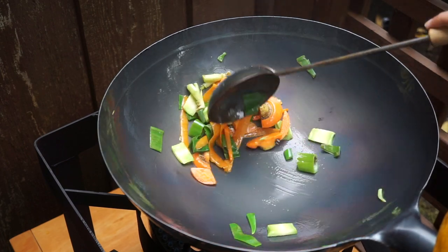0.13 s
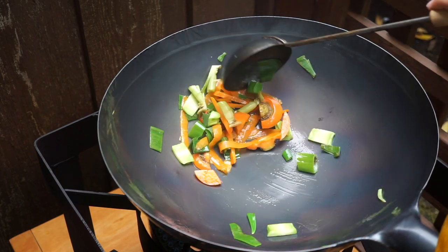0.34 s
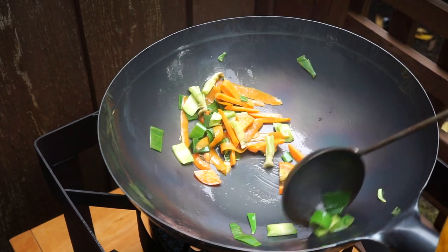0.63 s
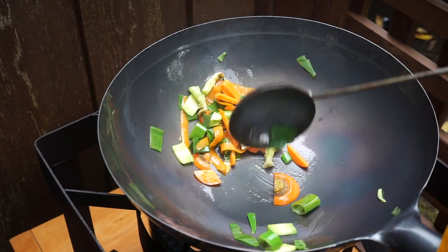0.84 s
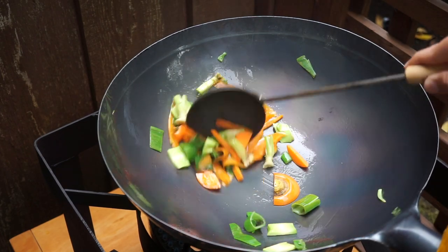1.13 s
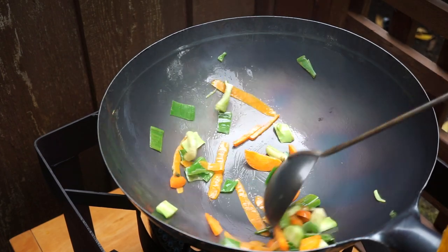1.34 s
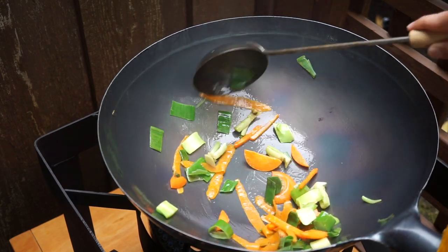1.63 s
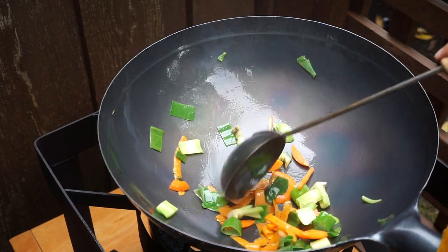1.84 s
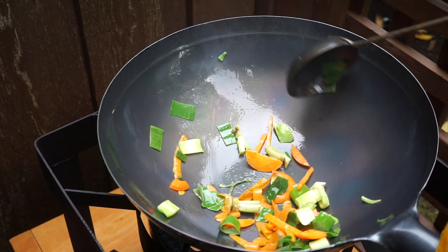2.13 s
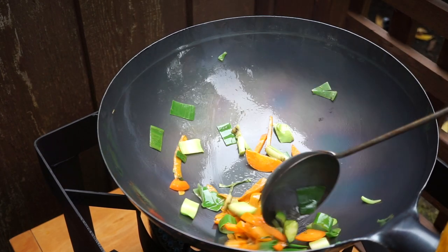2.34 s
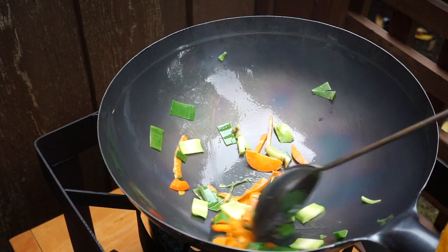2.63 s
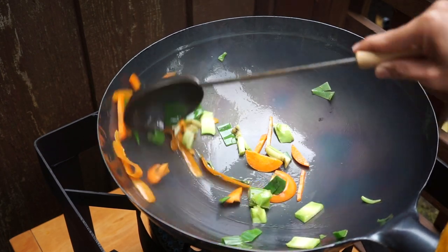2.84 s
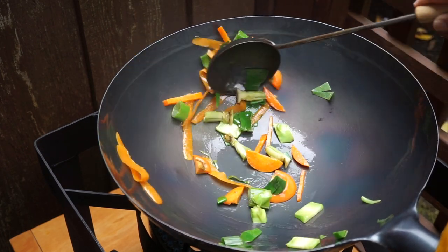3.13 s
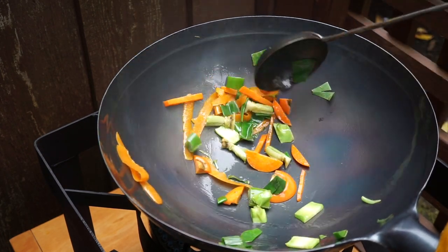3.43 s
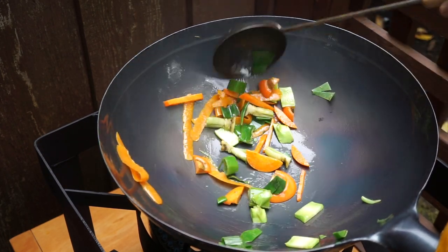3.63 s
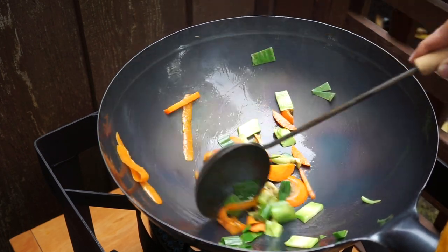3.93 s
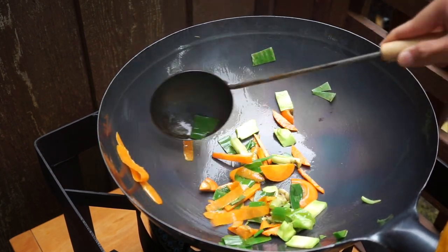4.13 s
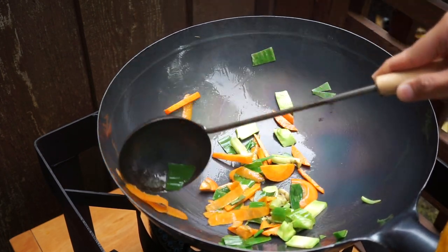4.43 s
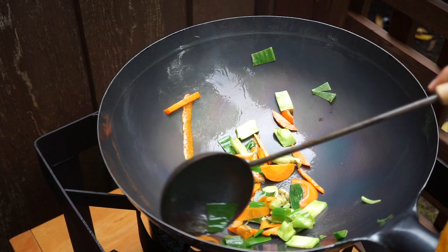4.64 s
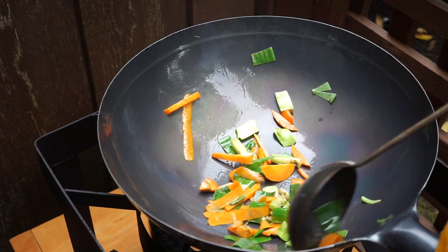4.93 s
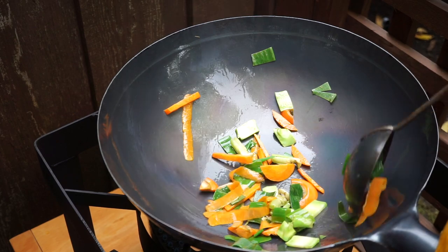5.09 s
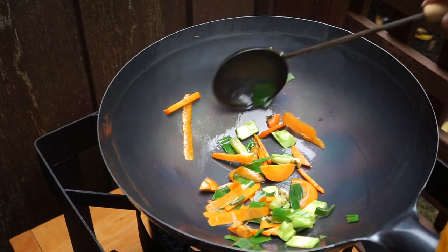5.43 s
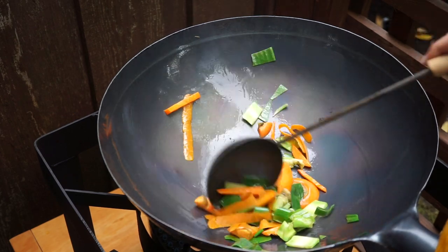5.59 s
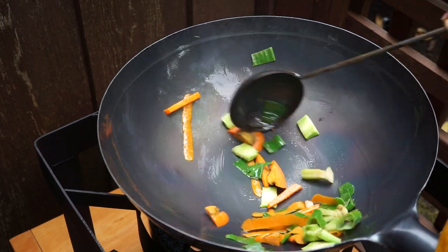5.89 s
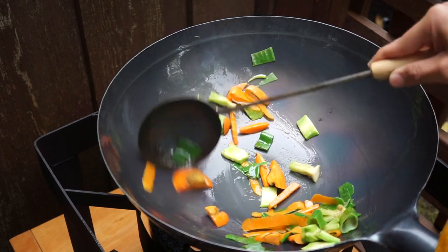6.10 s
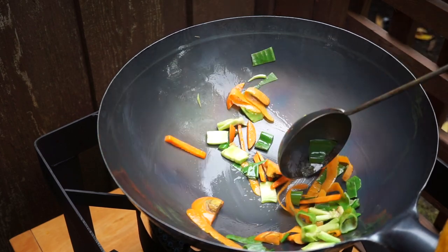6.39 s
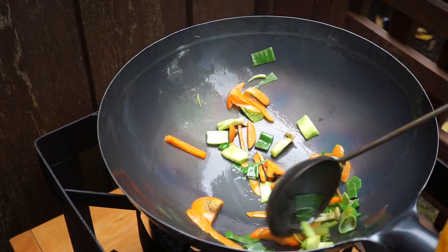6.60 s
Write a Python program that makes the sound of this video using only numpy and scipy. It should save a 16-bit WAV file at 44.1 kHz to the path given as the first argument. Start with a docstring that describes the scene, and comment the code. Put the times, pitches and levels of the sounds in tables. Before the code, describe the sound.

Close, bright sizzle of hot oil in a wok, with gritty ladle scrapes, metallic clanks, low bowl thumps and increasingly frequent crackling pops.

```python
"""Hot oil sizzles in a steel wok outdoors, close to the microphone, as a ladle stirs vegetables.
Bursting water makes the sizzle, bubbling and single pops from noise shaped by random drops.
The ladle knocks and scrapes: noise drives short treble modes of the steel, modes of the ladle
and booming low modes of the bowl. Noise makes a faint far rumble behind them."""
import sys
import numpy as np
from scipy import signal
from scipy.fft import rfft, irfft, next_fast_len
from scipy.io import wavfile
from scipy.ndimage import uniform_filter1d, map_coordinates

SR = 44100
rng = np.random.default_rng(int(sys.argv[2]) if len(sys.argv) > 2 else 0)


def invert_db(level):
    """Linear amplitude ratio for a level in decibels (20 dB per decade), elementwise."""
    return 10 ** (np.asarray(level, dtype=float) / 20)


def file_out(sig):
    """Save sig as 16-bit WAV at sys.argv[1]."""
    # one column per channel
    cols = np.atleast_2d(sig).T
    # limit, then scale
    lim = np.clip(cols, -1, 1)
    pcm = np.round(lim * 32767).astype(np.int16)
    wavfile.write(sys.argv[1], SR, pcm)


N = 297675  # length in samples


def unit(x):
    """Scaled to rms 1."""
    return x / np.sqrt(np.mean(x ** 2) + 1e-20)


def along(points, hz):
    """Values at hz, from (frequency, value) points on a log frequency axis."""
    f, v = np.transpose(points)
    return np.interp(np.log(hz + 1), np.log(f + 1), v)


def curves(rows):
    """One value per sample for each column after the time."""
    time_s, *columns = np.transpose(rows)
    return [np.interp(np.arange(N) / SR, time_s, column) for column in columns]


def wobble(rate):
    """A smooth random curve, rate knots a second."""
    knots = rng.standard_normal(int(N * rate / SR) + 4)
    return map_coordinates(knots, [np.arange(N) * rate / SR])


def filtered(x, response):
    """x times a complex response of frequency."""
    m = next_fast_len(N + SR // 2)
    return irfft(rfft(x, m) * response(np.fft.rfftfreq(m, 1 / SR)), m)[..., :N]


def above(f, hz):
    """Causal second-order high-pass response."""
    return -f * f / (hz * hz - f * f + 1.2j * f * hz)


def resonance(f, center, width, db):
    """Causal band-pass response of one mode, peaking at db."""
    return invert_db(db) * 1j * f * width / (center * center - f * f + 1j * f * width)


def modes(table):
    """Causal response of a set of modes, with alternating signs."""
    return lambda f: sum((-1) ** k * resonance(f, *row) for k, row in enumerate(table))


# how alike left and right are at the microphone: pitch_hz, likeness (correlation, 0 to 1)
LIKENESS = [(60, 0.97), (200, 0.97), (350, 0.62), (700, 0.75), (2000, 0.84), (4000, 0.53), (8000, 0.51),
            (14000, 0.15)]


def spread(pair):
    """Two unrelated sounds mixed to a stereo image whose width follows the likeness at each pitch."""
    turn = lambda hz: np.arccos(np.clip(along(LIKENESS, hz), 0, 1)) / 2
    mid, side = filtered(pair, lambda hz: np.array([np.cos(turn(hz)), np.sin(turn(hz))]))
    return np.array([mid + side, mid - side])


def scattered(x, smear_s):
    """A source and its short scattered copy off the wok's walls."""
    t = np.arange(SR // 50) / SR
    echo = rng.standard_normal(len(t)) * np.exp(-t / smear_s)
    echo -= uniform_filter1d(echo, size=60)  # no lows in the copy, so the bass stays centered
    copy = signal.fftconvolve(x, echo / np.linalg.norm(echo))[:N]
    return spread(np.array([x, copy]))


def bursts(spike_db, burst_s, share):
    """Noise whose size jumps with each bursting drop, by a random amount."""
    size = invert_db(spike_db * np.minimum(rng.exponential(size=N), 3.5))
    size *= rng.random(N) < share  # share of samples at which a drop bursts
    t = np.arange(SR // 100) / SR
    power = signal.fftconvolve(size ** 2, np.exp(-2 * t / burst_s))[:N]
    return unit(np.sqrt(np.abs(power)) * rng.standard_normal((2, N)))


BURST_S = .0005  # decay of a bursting drop

# color of the sizzle before it is scaled to rms 1: pitch_hz, density_db (per Hz)
SIZZLE_COLOR = [(1470, -70), (2500, -25), (2890, -24), (4390, -11.5), (5660, -10.5), (6360, -8.5),
                (6870, -7.5), (14000, 2), (15800, 1.5)]


def sizzle(high, low):
    """Steam hiss and two independent crackles of drops, one higher and one lower in pitch."""
    hiss = rng.standard_normal((2, N)) * invert_db(2.2 * wobble(30))
    high_share = lambda hz: 1 / (1 + (9500 / (hz + 1)) ** 4)  # share of the power
    crackle = filtered(high, lambda hz: np.sqrt(high_share(hz)))
    crackle += filtered(low, lambda hz: np.sqrt(1 - high_share(hz)))
    return unit(filtered(crackle + 1.14 * hiss, lambda hz: invert_db(along(SIZZLE_COLOR, hz)) * (hz > 2000)))


# color of the wet bubbling before it is scaled to rms 1: pitch_hz, density_db (per Hz)
BUBBLING_COLOR = [(500, -16), (800, -12.5), (1500, -3.5), (2500, 3.5), (4000, 6), (6000, -2.5), (9000, -34)]


def bubbling(crackle):
    """Lower wet bubbling: slower bursts, a little of the crackle and steady noise."""
    wet = bursts(spike_db=2.5, burst_s=0.0056, share=0.0054)
    wet += 0.15 * crackle + 0.59 * rng.standard_normal((2, N))
    return unit(filtered(wet, lambda hz: invert_db(along(BUBBLING_COLOR, hz))))


# loud drops bursting in the oil, levels before filtering:
# start_s, peak_db, body_db (lower body, above the peak level)
LOUD_DROPS = [(1.558, -4, -24), (2.5046, -16, -30), (2.578, -10.5, -24), (2.9096, -6.5, -16),
              (3.49, -12, -30), (3.891, -10, -14), (4.112, -7, -33), (4.128, -22, -30), (4.145, -19, -30),
              (4.2173, -12, -42), (4.2711, -10, -26), (4.3255, -22, -26), (4.4637, -13, -22),
              (4.5587, -13, -29), (4.596, -7.5, -29), (4.6797, -21, -28), (4.712, -10.5, -18),
              (4.743, -13, -11.5), (4.962, -13, -14), (5.0903, -14, -11), (5.247, -8, -36),
              (5.3283, -1.5, -22), (5.465, -7.5, -33), (5.56, -10, -22), (6.0683, -5, -23),
              (6.2409, -5, -12), (6.4397, -5, -15), (6.4992, -8, -12)]


def pops():
    """Single loud drops: short noise bursts, each with a bright snap and a lower body."""
    snap, body = snaps = np.zeros((2, N))
    t = np.arange(SR // 100) / SR
    for start_s, peak_db, body_db in LOUD_DROPS:
        burst = rng.standard_normal(len(t)) * t * np.exp(-t / BURST_S)
        levels = invert_db([[peak_db], [peak_db + body_db]])
        snaps[:, round(start_s * SR):][:, :len(t)] += levels * burst / np.abs(burst).max()
    bright = filtered(snap, lambda f: above(f, hz=7700) ** 2)
    return bright + filtered(body, lambda f: above(f, hz=1800) * (1 - above(f, hz=7000)))


# how hard the oil fries as food is turned over in it, before the dips, the scrape's hiss and the
# fall of the bubbling: time_s, sizzle_db, bubbling_db (above the sizzle)
FRYING_LEVELS = [(0, -27, -1.5), (.05, -28.5, -14), (.13, -21, -17.5), (.22, -22, -21.5), (.43, -26.5, -20),
                 (.8, -27.5, -21.5), (1.22, -24.5, -18.5), (1.3, -21.5, -18), (1.4, -24.5, -23),
                 (1.65, -27.5, -22), (1.7, -24.5, -20), (2.05, -27.5, -20), (2.4, -27, -22.5),
                 (2.74, -25.5, -18), (2.86, -22, -17.5), (3.1, -24.5, -24), (3.38, -27, -16.5),
                 (3.44, -22.5, -18), (3.52, -27.5, -23.5), (3.68, -29, -21), (3.78, -26, -22.5),
                 (3.95, -26.5, -17.5), (4.02, -21.5, -21.5), (4.14, -29.5, -22), (4.22, -22.5, -22.5),
                 (4.53, -29, -22), (4.64, -28, -21), (4.79, -28, -20), (4.94, -26.5, -18.5),
                 (5.24, -28.5, -23), (5.56, -27.5, -21), (5.72, -26.5, -17), (5.96, -22.5, -20),
                 (6.3, -24.5, -22.5), (6.5, -27, -20), (6.75, -24.5, -25.5)]
# the frying dips briefly: middle_s, depth_db
DIPS = [(.32, 3), (1.14, 1.5), (2.08, 2), (2.6, 3), (3.72, 4), (4.249, 7), (4.7, 7), (5.265, 7),
        (5.49, 5.5), (5.7, 2.5), (6.26, 0.5)]
DIP_S = 0.027  # from the middle of a dip to 1/e of its depth
SCRAPE_HISS_DB = 2  # bright hiss of the scrape, over its level
BUBBLING_FALL_DB = 16.5  # weight of the scrape size as the bubbling level falls with it


def frying(drag):
    """Water bursting in hot oil; a scrape comes with bright hiss, and the bubbling falls as it rises."""
    dips_db = sum(db * np.exp(-((np.arange(N) / SR - s) / DIP_S) ** 2) for s, db in DIPS)
    sizzle_db, bubbling_db = curves(FRYING_LEVELS)
    sizzle_db = sizzle_db - dips_db
    bright_size = np.hypot(invert_db(sizzle_db), invert_db(SCRAPE_HISS_DB) * drag)
    bubbling_size = invert_db(sizzle_db + bubbling_db) / (1 + invert_db(BUBBLING_FALL_DB) * drag)
    high, low = (bursts(spike_db=3.5, burst_s=BURST_S, share=.01) for _ in range(2))
    steady = bright_size * sizzle(high, low) + bubbling_size * bubbling(low)
    return spread(steady) + scattered(pops(), smear_s=0.00034)


def gesture(s, stages_s, stages_db, fade_db_per_s):
    """Size over time of one contact: straight dB lines between its stages, then a steady fade."""
    u = np.arange(N) / SR - s
    fade_db = fade_db_per_s * np.maximum(u - stages_s[-1], 0)
    return invert_db(np.interp(u, stages_s, stages_db) - fade_db) * (u >= 0)


# ladle rim dragged over the steel: start_s, length_s, first_db, middle_db, end_db (scrape levels)
RIM_STROKES = [(0, 0.017, -27.5, -34, -33), (0.378, 0.12, -31.5, -39, -31),
               (0.521, 0.24, -30.5, -28.5, -30.5), (1.232, 0.062, -31.5, -34, -34),
               (1.676, .03, -32, -37, -41), (2.105, .25, -37.5, -27.5, -28.5),
               (2.706, .22, -42.5, -39.5, -42), (3.202, .1, -44, -35.5, -43), (3.36, 0.074, -46, -38, -34),
               (3.743, 0.03, -31, -34.5, -32.5), (3.841, 0.083, -26.5, -38, -37.5),
               (5.35, 0.092, -34.5, -26, -31.5), (5.569, 0.035, -36, -42, -45),
               (5.757, 0.19, -52, -36.5, -45), (6.013, 0.16, -49, -51, -46),
               (6.291, 0.14, -28.5, -30.5, -40)]
BITE_S, BITE_DB = 0.0041, 9.5  # the rim bites in: longest rise, and its height
LIFT_DB_PER_S = 382  # fade as the rim lifts


def dragging():
    """Size of the scrape over all strokes."""
    size = np.zeros(N)
    for start_s, length_s, first_db, *rest_db in RIM_STROKES:
        stages_s = [0, min(BITE_S, length_s / 4), length_s / 2, length_s]
        size += gesture(start_s, stages_s, [first_db - BITE_DB, first_db, *rest_db], LIFT_DB_PER_S)
    return size


def rubbed(level, table, chatter_db, shift_db):
    """A rough moving contact: each mode is driven more or less as the contact point wanders."""
    grit = rng.standard_normal(N) * invert_db(chatter_db * wobble(300))
    grit *= level / np.std(filtered(grit, modes(table)))
    out = np.zeros(N)
    for k, row in enumerate(table):
        out += (-1) ** k * filtered(grit * invert_db(shift_db * wobble(12)), modes([row]))
    return out


# weight of ladle and food landing in the bowl: start_s, rise_s, boom_db, hold_s
LANDINGS = [(.377, 0.013, -31.5, 0.035), (0.478, .03, -46, 0.27), (.84, .02, -59.5, 0.11),
            (1.087, .003, -29.5, 0), (1.225, 0.013, -40.5, 0.021), (1.673, 0.042, -35, 0),
            (2.108, 0.06, -29, 0.02), (2.34, 0.013, -46.5, 0.0014), (2.641, 0.0023, -41, 0.07),
            (2.926, 0.028, -63, 0.022), (3.199, 0.0044, -48, 0.059), (3.36, 0.055, -49.5, 0),
            (3.737, 0.0033, -45.5, 0), (3.828, 0.0089, -55, 0.18), (4.36, .005, -53.5, 0.039),
            (5.344, 0.0058, -49.5, 0.074), (5.49, 0.023, -50, 0.0099), (5.575, 0.04, -39.5, 0),
            (5.825, 0.021, -47.5, 0.011), (6.085, .005, -49.5, 0.065), (6.267, 0.036, -46.5, 0.1),
            (6.609, 0.016, -49, 0.059)]
LAND_DB, SETTLE_DB_PER_S = 10, 174  # rise of a landing, then its fade


def landing():
    """Size of the push on the bowl over all landings."""
    return sum(gesture(s, [0, rise_s, rise_s + hold_s], [db - LAND_DB, db, db], SETTLE_DB_PER_S)
               for s, rise_s, db, hold_s in LANDINGS)


# ladle knocks, drive levels before the modes: start_s, clack_db, push_db (on the bowl, above the
# clack), ring_db (blow to the steel, above the clack)
LADLE_KNOCKS = [(.06, -33, 24, 8), (0.378, -18.5, 32.5, 8.5), (0.847, -41.5, 24.5, 23),
                (1.089, -38, 57.5, 0), (1.114, -25.5, 24, 10.5), (1.238, -27, 46, 13),
                (1.675, -21.5, 33, 10), (2.111, -27.5, 40.5, 18.5), (2.155, -34, 36, 8),
                (2.644, -37, 29, 17.5), (3.311, -35, 31, 0), (3.748, -29.5, 31, 15.5),
                (3.839, -31.5, 19.5, 23.5), (4.868, -32, 21, -1.5), (5.661, -26, 32, 12)]


def knocking():
    """What each knock drives: a short clack, a longer blow to the steel, a one-sample push."""
    clacks, blows, pushes = np.zeros((3, N))
    t = np.arange(SR // 20) / SR
    for start_s, clack_db, push_db, ring_db in LADLE_KNOCKS:
        i = round(start_s * SR)
        noise = rng.standard_normal(len(t))
        clacks[i:i + len(t)] += invert_db(clack_db) * uniform_filter1d(noise, size=4) * np.exp(-t / 0.0025)
        blows[i:i + len(t)] += invert_db(clack_db + ring_db) * noise * np.exp(-t / 0.0063)
        pushes[i] += invert_db(clack_db + push_db)
    return clacks, blows, pushes


# moments when a single mode of ladle or wok sings out, before its flutter:
# start_s, pitch_hz, level_db, rise_s, decay_s
SINGING_MODES = [(.45, 1253, -66, 0.13, 1), (.61, 974, -61, .01, .04), (.8, 1800, -54.5, 0.036, .2),
                 (.847, 3200, -46, 0.0013, 0.053), (1.25, 3515, -36.5, 0.014, 0.021),
                 (2.19, 3515, -30, 0.012, 0.026), (3.002, 3160, -30, .003, 0.0049),
                 (3.839, 914, -40.5, 0.0017, 0.0033), (5.371, 1644, -44, 0.033, 0.018),
                 (5.365, 1120, -54, .02, 0.035), (6.34, 2130, -46, 0.008, 0.022)]
RING_FLUTTER_DB, RING_WAVER_RAD = 3, .6  # unsteadiness of level and of phase


def rings():
    """Slightly unsteady tones that swell and fade."""
    out, t = np.zeros(N), np.arange(N) / SR
    for start_s, hz, db, rise_s, decay_s in SINGING_MODES:
        u = np.maximum(t - start_s, 0)
        swell = (1 - np.exp(-u / rise_s)) * np.exp(-u / decay_s)
        tone = np.sin(2 * np.pi * hz * u + RING_WAVER_RAD * wobble(60))
        out += invert_db(db + RING_FLUTTER_DB * wobble(40)) * swell / swell.max() * tone
    return out


# treble modes of the steel: pitch_hz, width_hz, level_db
STEEL_MODES = [(3090, 110, -7.5), (3515, 59, -4.5), (3910, 220, -2.5), (4382, 66, 1), (4565, 53, -0.5),
               (4850, 91, -1), (5150, 40, 0.5), (5500, 210, -2.5), (5500, 550, -7.5), (6410, 310, -4.5),
               (6766, 58, -3.5), (7140, 140, -8.5), (8940, 860, -10.5), (11100, 610, -12)]
# modes of the ladle's cup and stem, and last a broad low mode of the wok's steel: pitch_hz, width_hz, level_db
LADLE_MODES = [(710, 9.4, -31), (834, 14, 5), (1076, 62, 5), (1253, 18, 6), (1830, 24, 6.5),
               (1800, 42, -25), (2130, 400, 2.5)]
# low modes of the bowl: pitch_hz, width_hz, level_db
BOWL_MODES = [(80, 10, -21.5), (152.4, 9.5, -4.5), (184.2, 10.9, 3.5), (242, 32.5, 1.5), (280.2, 31, -4),
              (285.3, 17.4, -1.5), (460, 48, -14), (492, 156, -23)]


def ladle(drag):
    """Rubbing and single knocks drive modes of steel, ladle and bowl; single modes sing out."""
    clacks, blows, pushes = knocking()
    steel = rubbed(drag, STEEL_MODES, chatter_db=1.5, shift_db=2.5) + filtered(blows, modes(STEEL_MODES))
    # a steep low cut keeps the steel's scrape and ring bright
    steel = filtered(steel, lambda f: above(f, hz=3110) ** 3)
    cup = rubbed(drag * invert_db(-24), LADLE_MODES, chatter_db=2, shift_db=2.5)
    cup += invert_db(-3) * filtered(clacks, modes(LADLE_MODES))
    bowl = rubbed(landing(), BOWL_MODES, chatter_db=0.0, shift_db=-0.5)
    bowl += filtered(pushes, modes(BOWL_MODES))
    contact = filtered(clacks, lambda f: above(f, hz=840) ** 2)
    return steel + cup + bowl + rings() + contact


# far rumble: time_s, level_db
RUMBLE_LEVELS = [(0.0, -59), (1.2, -66), (2.08, -62.5), (2.91, -67), (6.75, -67.5)]
# color of the rumble before it is scaled to rms 1: pitch_hz, density_db (per Hz)
RUMBLE_COLOR = [(12, -39), (20, -3), (149, -1.5), (189, 3), (236, -4), (335, -9.5), (755, -19), (900, -4.5),
                (1170, -6.5), (1980, -120)]


def outdoors():
    """Faint far rumble of the open air: slowly wavering low noise."""
    noise = rng.standard_normal((2, N)) * invert_db(2.6 * wobble(3.2))
    rumble = spread(filtered(noise, lambda hz: invert_db(along(RUMBLE_COLOR, hz))))
    return invert_db(curves(RUMBLE_LEVELS)[0]) * unit(rumble)


def scene():
    """The wok, slightly louder on the left, with the open air around it."""
    drag = dragging()
    wok = frying(drag) + scattered(ladle(drag), smear_s=.008)
    return wok * invert_db([[.3], [-.3]]) + outdoors()


def top_cut(x):
    """Nothing passes above the cut-off."""
    return signal.sosfilt(signal.butter(12, 17080, fs=SR, output="sos"), x)


def record(dry):
    """The microphone signal, with a steep band limit at 15670 Hz."""
    mix = filtered(dry, lambda hz: 1 / (1 + (hz / 15670) ** 150))
    return top_cut(mix)


dry = scene()
out = record(dry)
file_out(out)
```